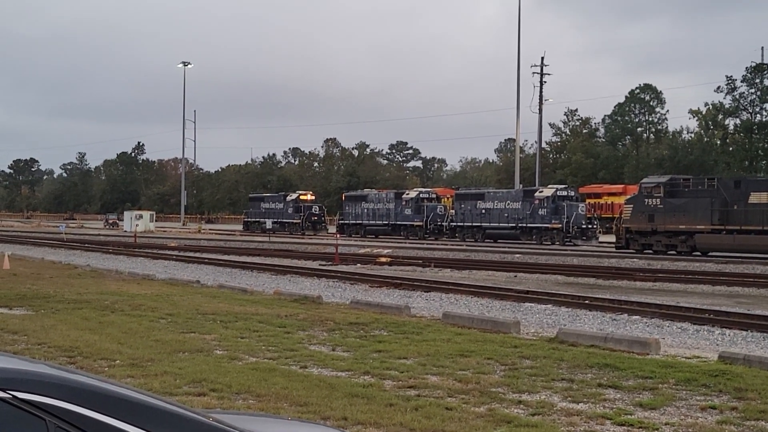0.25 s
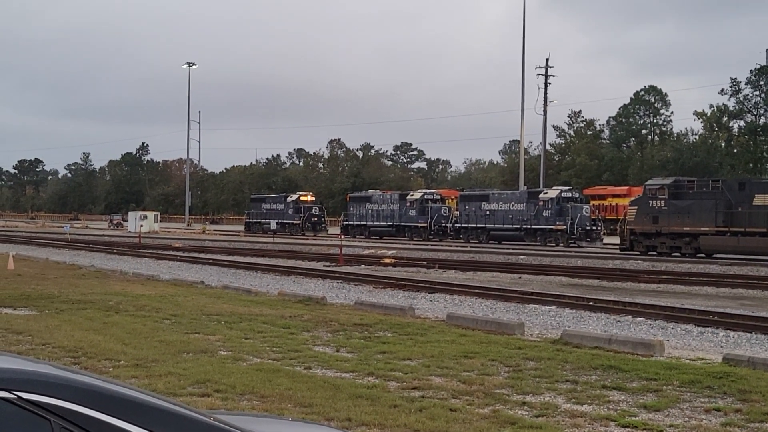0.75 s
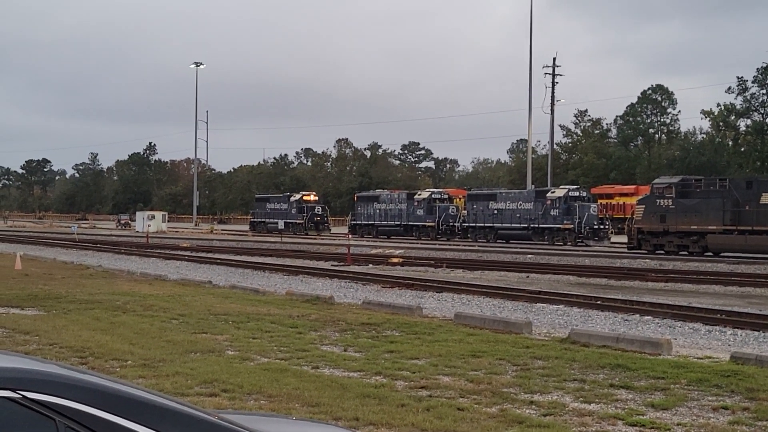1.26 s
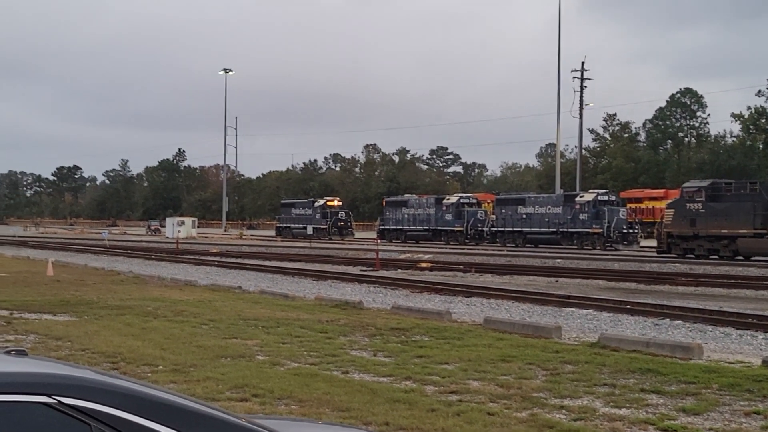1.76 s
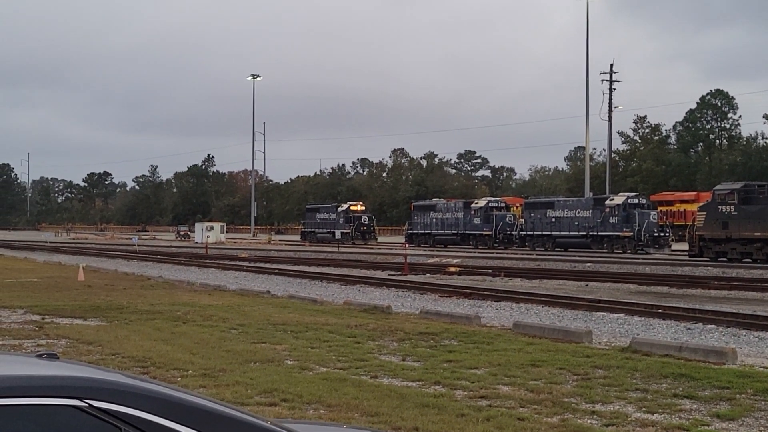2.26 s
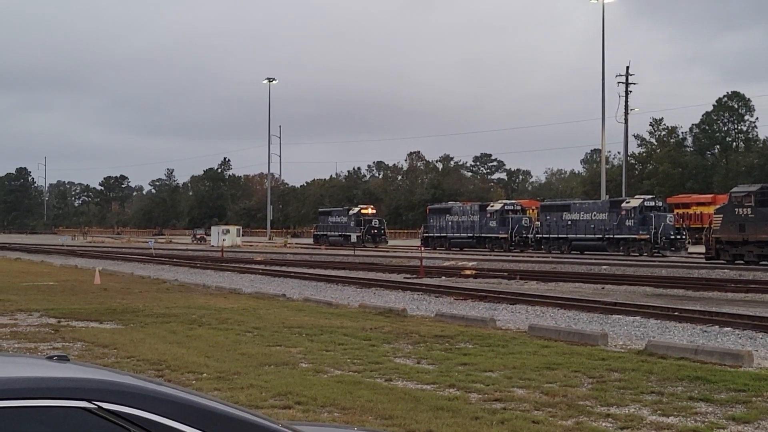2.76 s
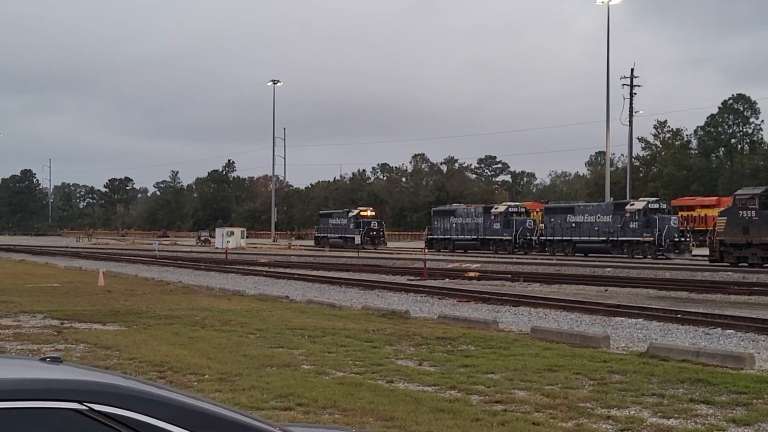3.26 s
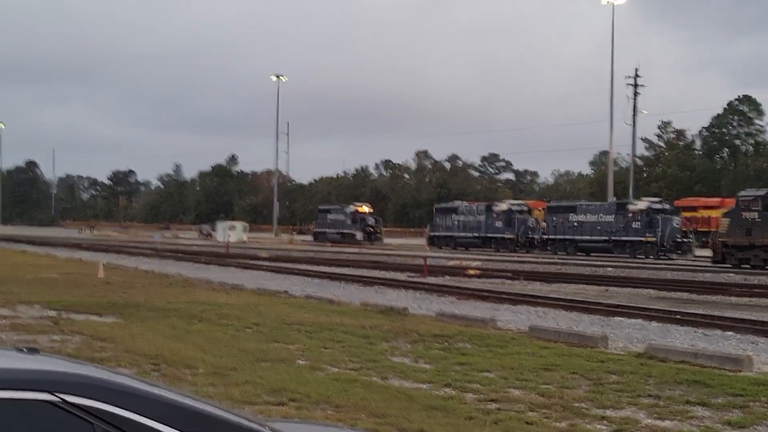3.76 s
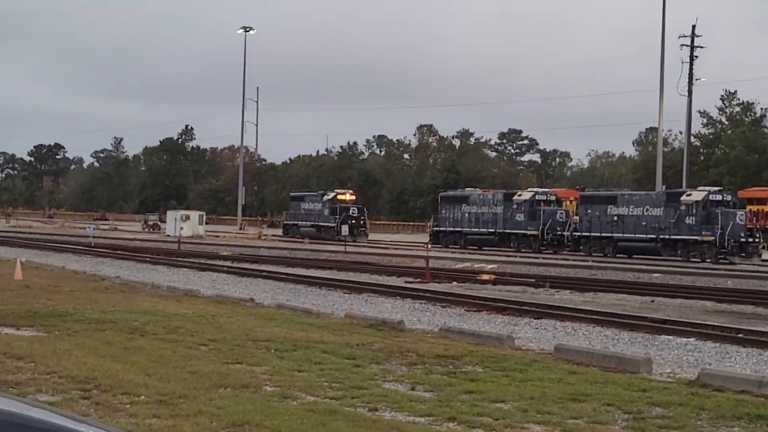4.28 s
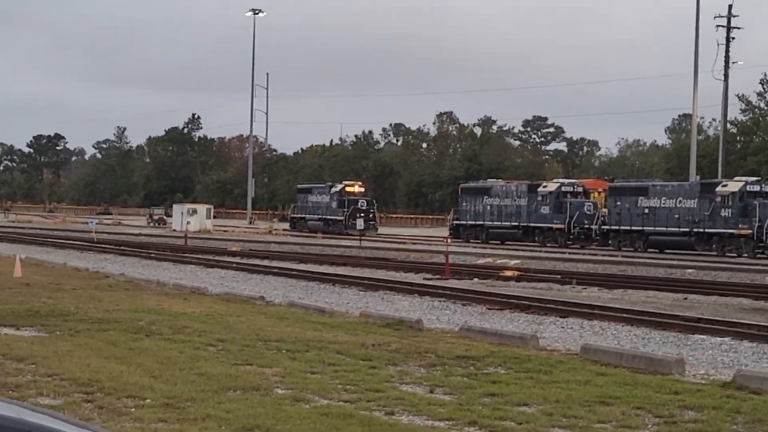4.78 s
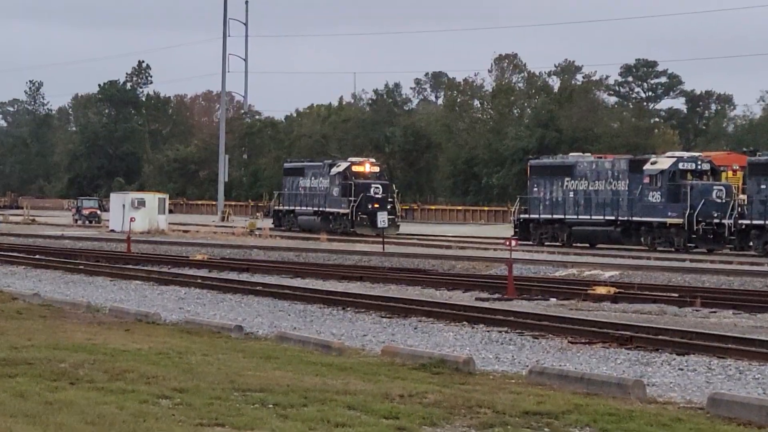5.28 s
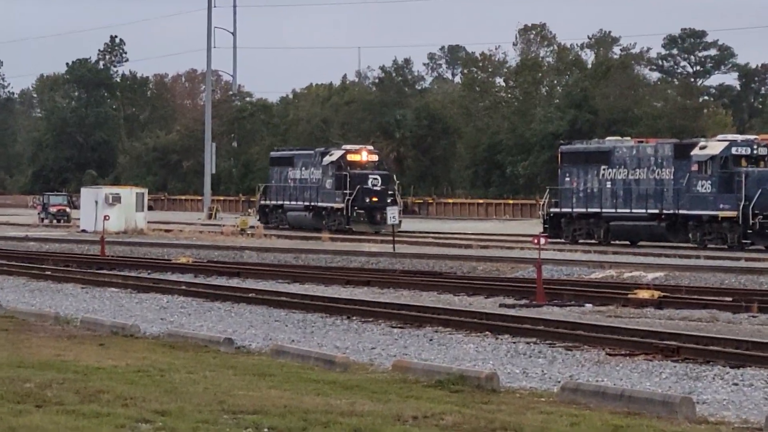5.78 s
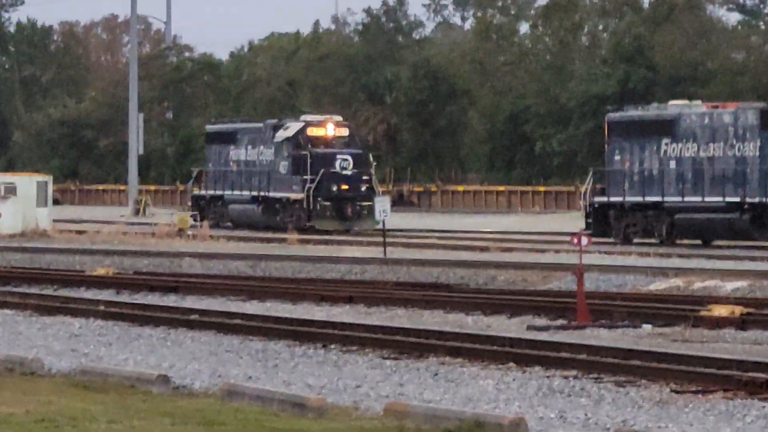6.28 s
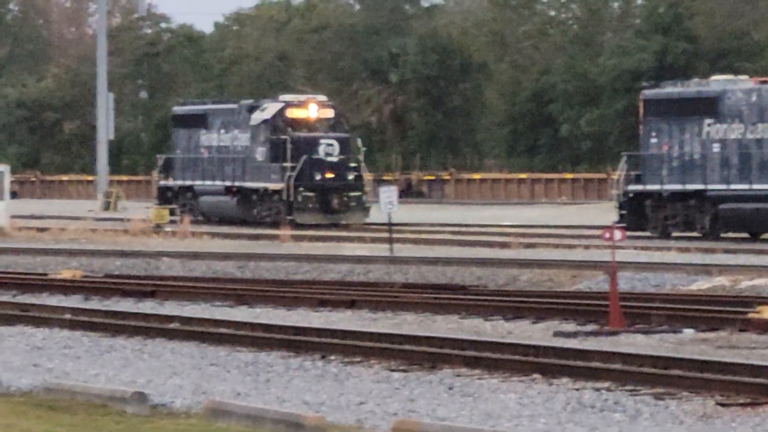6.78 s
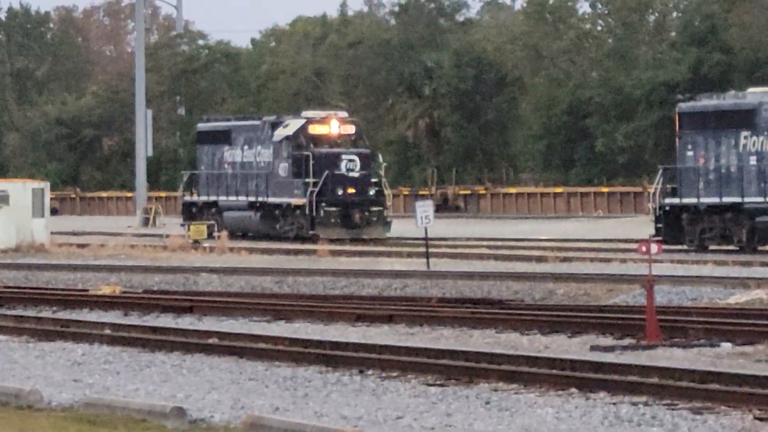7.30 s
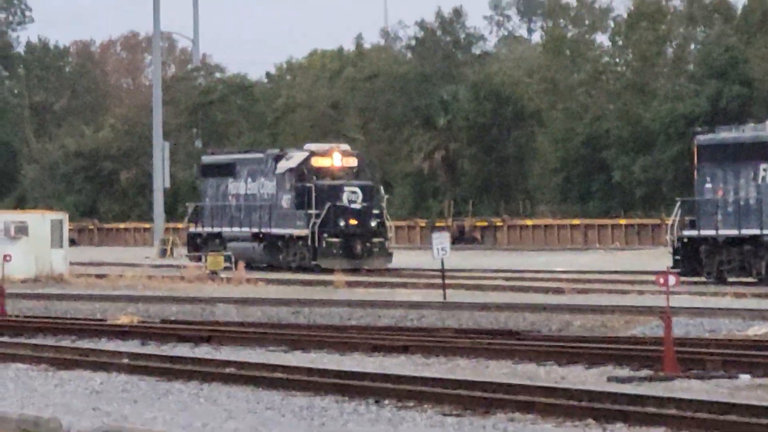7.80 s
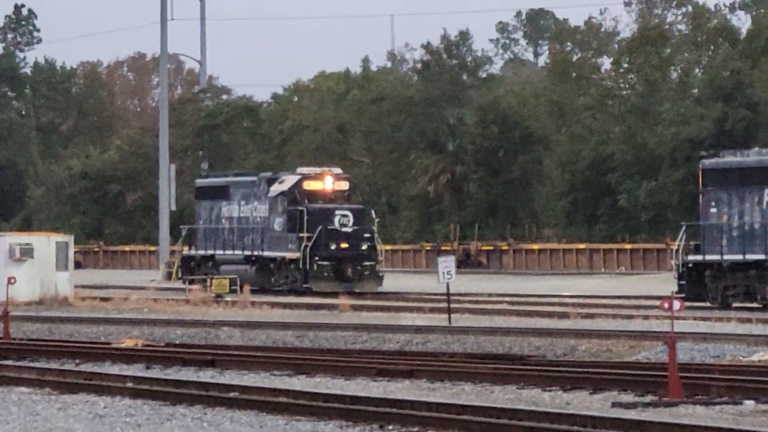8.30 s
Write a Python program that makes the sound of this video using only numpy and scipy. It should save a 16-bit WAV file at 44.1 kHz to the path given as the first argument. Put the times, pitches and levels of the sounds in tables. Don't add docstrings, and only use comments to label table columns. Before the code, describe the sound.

Open rail yard: deep throbbing idle engines, airy fan roar and leaks growing nearer, a sharp air release, falling turbo whistle, wind thumping the microphone.

```python
import sys
import numpy as np
from scipy import signal
from scipy.fft import rfft, irfft, next_fast_len
from scipy.io import wavfile
from scipy.ndimage import uniform_filter1d, map_coordinates

SR = 44100
rng = np.random.default_rng(int(sys.argv[2]) if len(sys.argv) > 2 else 0)


def convert_level_to_amplitude(level_db):
    exponent = np.asarray(level_db, float) / 20
    return 10 ** exponent


def master(y):
    cut = np.clip(np.atleast_2d(y).T, -1, 1)
    pcm = np.round(cut * 32767)
    wavfile.write(sys.argv[1], SR, pcm.astype(np.int16))


N = 376878

# multiple of the firing cycle, level in dB.
NEAR_ORDERS = [(11, -35), (12, -20), (13, -11), (14, -43), (15, 2.5), (16, -5.5), (17, -19), (18, -5),
               (19, -10.5), (20, -12.5), (21, -21), (22, -10), (23, -9.5), (24, -15), (25, -16.5),
               (26, -15), (27, -33), (28, -31)]
SECOND_ORDERS = [(8, -23), (9, -37), (12, -11), (13, -9), (14, -9), (15, -10), (16, 1.5), (17, -13),
                 (18, -10), (19, -15), (20, -13)]
ROLLING_ORDERS = [(7, -13), (8, 0), (9, -16), (10, -15), (11, -12), (12, -15), (13, -4), (14, -21),
                  (15, -5.5), (16, -13), (17, -20), (24, -17.5)]
FAR_ORDERS = [(5, -14), (7, -10), (8, -3), (9, -9), (11, -17), (13, -19), (17, -24)]
NEAR_RATE, SECOND_RATE, ROLLING_RATE, FAR_RATE = 220, 266, 380, 585
# time in seconds, then near, second, rolling
# and far engine in dB.
EXHAUST = [(0, -32, -23, -28.5, -60), (1.5, -26.5, -27.5, -25.5, -24), (3, -25, -30, -28, -30),
           (4.5, -24.5, -28, -23.5, -26.5), (6, -25.5, -24.5, -29, -27.5), (7.2, -22, -27.5, -41, -24),
           (8.55, -20.5, -25, -43, -36)]
# time in seconds, nearness in dB, air blown off in dB.
APPROACH = [(0, 0.5, -1.5), (.6, -0.5, -1.5), (1.3, 0, 0.5), (2.6, 0, 1), (3.1, 1.5, 0), (3.6, -1, -0.5),
            (4, 2, 1.5), (4.5, 4, 2), (5.2, 5.5, 3), (5.7, 5, 2), (6.4, 7, 1), (7, 6, 0.5), (7.6, 5.5, 0.5),
            (8.1, 6, 1), (8.55, 5, 0.5)]
# deepest moment in seconds, depth in dB, sinking time in seconds.
BASS_DIPS = [
    (6.8, -13, 0.26),
    (7.46, -7, 0.064),
]
RECOVER_S = 0.043

# frequency in Hz, level in dB per Hz.
STACK = [(12, -33), (20, -13), (40, -4.5), (69, -3.5), (90, -6.5), (125, -4.5), (160, -51), (280, -120)]
BLOCK = [(65, -42), (110, -20), (132, -3), (156, -2), (248, -9), (312, -14), (420, -29.5), (550, -26.5),
         (920, -120)]
DRONE = [(210, -34), (360, -4.5), (409, -7.5), (680, -8), (735, -6.5), (794, -6.5), (1190, -7.5),
         (1350, -10.5), (1760, -57), (2970, -120)]
FANS = [(740, -51), (1250, -9), (1400, 0), (1650, -2), (1850, -2.5), (2200, -3.5), (2600, -6), (2920, -2.5),
        (3080, -6), (3200, -11), (3700, -14), (4700, -52), (8000, -120)]
LOUVRES = [(2700, -40), (3150, 1), (3500, -1), (4200, -2), (4500, -7), (5200, -50), (8000, -120)]
HISS = [(1940, -60), (3300, -5.5), (4300, -2), (4530, -7.5), (4700, 1.5), (5300, -1.5), (5800, -3.5),
        (6500, -1), (7050, -1), (7520, -5.5), (8700, -12.5), (9200, -22), (12000, -21), (20000, -120)]
AIR = [(6000, -15), (8800, 0.5), (9600, -1), (11300, -5), (11900, -2.5), (14100, -2.5), (15300, -2),
       (15900, -7.5), (20000, -6)]
STACK_DB, BLOCK_DB, DRONE_DB, FANS_DB = -31, -38.5, -45, -45
LOUVRES_DB, HISS_DB, AIR_DB = -52.5, -51, -60
BLOCK_GROWS, DRONE_GROWS, LOUVRES_GROWS = 1.09, 0.64, 0.082
HISS_GROWS, AIR_GROWS, AIR_BLOWS = 0.93, 1, 0.63

# frequency in Hz, level in dB.
WHINES = [(670, -62), (777, -56.5), (1338, -61), (1405, -80), (1841, -72), (3526, -78)]
# frequency in Hz, level in dB.
PANELS = [(1480, -64), (1830, -57), (2380, -64.5), (2600, -60.5), (2950, -60), (3480, -57.5), (4760, -70),
          (6550, -73), (6980, -75)]
PANEL_SMEAR_RAD, PANEL_FLICKER_DB = 2, 3
# frequency in Hz, likeness from 0 to 1.
ALIKE = [(50, 0.6), (90, 0.73), (130, 1), (300, 0.94), (600, 0.53), (1200, 0.71), (2900, 0.4), (3300, 0.13),
         (8400, 0.13), (12000, 0.19), (16000, 0.85)]
LEAKS_ALIKE = [(3000, .35), (6000, .4), (8000, .55), (10500, .45), (16000, .5)]
BEARING_US, BEARING_RATE = 45, .7

# frequency in Hz, level in dB per Hz.
SPIT = [(880, -38), (1500, -23), (2260, -10), (3300, 0), (4000, -8), (4900, -5), (6500, -5), (7600, -5),
        (8200, -3), (8800, -6), (9300, -11), (12000, -14.5), (16200, -20)]
# start in seconds, length in seconds, level in dB, left over right in dB.
VALVES = [
    (4.763, 0.033, -42, -2),
    (5.254, 0.18, -36.5, -1.5),
]
POP, POP_T60_S = .6, .05
NOZZLE_HZ, NOZZLE_WIDTH_HZ, NOZZLE_DB, SPUTTER_DB = 8300, 600, -4, 1.1
# start in seconds, rise in seconds,
# time to fall by 60 dB in seconds, middle frequency in Hz, level in dB.
CHUFFS = [(1.272, 0.0033, 0.51, 3880, -40), (1.775, .004, .15, 9000, -51), (2.555, 0.0063, 0.56, 3240, -42),
          (2.96, 0.0074, 0.091, 3595, -40), (3.095, 0.0092, 0.18, 2940, -39.5),
          (3.4, 0.019, 0.24, 2500, -28.5), (3.43, 0.044, 2.1, 2700, -39.5), (0, 0.078, 3.3, 3900, -50),
          (3.25, 0.12, 0.46, 5500, -46), (3.415, 0.013, 0.14, 4670, -43), (3.2, .15, 0.81, 3800, -37),
          (5.252, .005, .1, 4000, -36), (3.41, 0.016, 0.2, 9150, -50), (3.75, .05, 0.72, 6800, -70),
          (3.64, .12, 2, 2800, -42), (3.74, 0.1, 1.2, 3780, -46), (3.83, 0.14, .1, 2450, -39),
          (5.13, .06, 0.43, 2250, -34), (5.89, 0.039, 0.34, 2800, -36), (6.46, 0.012, 1.05, 2600, -33.5),
          (8.07, 0.062, 0.71, 2600, -38)]
WIDEST, NARROWS_S = 0.97, 0.12
# start in seconds, time to fall by 60 dB in seconds,
# frequency in Hz, level in dB.
RINGS = [(3.07, .3, 2200, -44), (3.482, .05, 3100, -39), (3.395, .12, 3050, -40), (3.59, .3, 2950, -45),
         (3.79, .2, 4000, -43), (3.9, .4, 2400, -44), (5.225, .08, 4100, -38), (5.225, .15, 2850, -41),
         (5.29, .5, 3300, -45), (5.16, .3, 2350, -44), (5.52, .2, 7100, -50), (6.21, .3, 7500, -52),
         (6.455, .3, 4020, -42), (6.5, .2, 3930, -46)]
RING_RISE_S, RING_WIDTH_HZ = 0.032, 200

# time in seconds, frequency in Hz.
TURBO_HZ = [(0, 5410), (2.5, 5368), (4.3, 5350), (5.2, 5200), (5.9, 4830), (6.0, 4795), (6.12, 4690),
            (6.33, 4530), (6.55, 4440), (6.9, 4395), (7.0, 4376), (8.55, 4345)]
# middle in seconds, half length in seconds, level in dB.
SWELLS = [(.24, .18, -59), (.45, .2, -65), (1.2, .6, -70), (1.95, .35, -67), (2.42, .13, -55),
          (2.47, .07, -54), (4.8, .65, -59), (5.55, .3, -63), (5.93, .07, -58), (6.05, .08, -51),
          (6.42, .12, -57), (6.55, .07, -55), (6.7, .3, -61), (7.01, .06, -55), (7.12, .26, -55.5),
          (7.19, .07, -55), (7.37, .07, -63), (8, .5, -66)]
SMEAR_RAD, SMEAR_PER_KHZ = .9, .9
# start
# in seconds, end in seconds, frequency in Hz, level in dB, roughness in radians.
SQUEALS = [(.05, .45, 6830, -60, .7), (.9, 1.9, 6830, -65, .9), (2.1, 2.95, 6830, -65, .6),
           (.1, .62, 13657, -71, .8), (.9, 1.45, 13657, -77, 1.2), (1.45, 1.82, 13657, -70, .8),
           (.1, .5, 10244, -75, .8), (1.0, 1.55, 1005, -62, .4), (4.62, 5.07, 2022, -50, .3),
           (4.95, 5.27, 2020, -48, .3), (5.85, 6.15, 2935, -54, 1.6), (6.2, 6.4, 3000, -51, 1.3),
           (7.0, 7.4, 2895, -54, 1.3), (6.7, 7.25, 10218, -71, 1), (7.0, 8.2, 9787, -75, 1)]
# time in seconds, peak in dB, frequency in Hz, width in Hz, thin top in dB.
TICKS = [
    (4.2536, -21.5, 5900, 2000, -12),
    (4.2566, -36, 6000, 1500, -15),
    (4.2645, -38, 6000, 6000, -2),
    (5.188, -24, 9000, 5000, -9),
    (5.207, -46, 12500, 3000, -8),
    (6.121, -14, 6680, 800, -9),
    (6.1411, -35, 4600, 1500, 0),
]
TICK_PAN_DB = -12

# middle in seconds, half length in seconds, frequency in Hz, level in dB.
BOOMS = [
    (0.187, 0.011, 68, -13.5),
    (2.501, 0.18, 66.7, -30),
    (6.14, 0.041, 162.7, -26.5),
    (6.66, 0.026, 214, -33.5),
    (8.053, 0.075, 69.8, -21),
    (8.07, 0.11, 171.2, -28.5),
]
# middle in seconds, length in seconds, left port in dB, right port in dB, sharpness in dB.
PUFFS = [(0.09, 0.01, -31, -33, -21), (0.21, 0.062, -43, -28.5, -28), (0.382, 0.036, -42, -24, -19),
         (2.209, 0.017, -28.5, -40, -4.5), (2.276, 0.016, -25, -29, -24), (2.44, 0.071, -26, -32, -13),
         (3.12, 0.048, -45, -38, -5), (6.158, 0.05, -23, -28, -25), (6.454, 0.057, -20.5, -31, -7),
         (6.506, 0.038, -26, -30.5, -0.5), (6.66, 0.031, -31, -36, -24), (6.903, 0.034, -28, -19, -7),
         (6.951, 0.028, -28, -32, -6), (7.108, 0.087, -31, -25, -27), (7.271, 0.024, -32, -22, -22),
         (7.394, 0.026, -28, -16, -15), (7.625, 0.031, -38, -28.5, 5.5), (7.664, 0.025, -36, -25.5, -7),
         (7.852, 0.033, -37, -27, -23), (8.086, 0.045, -28, -24, -12), (8.33, 0.061, -37, -46, -12)]
# time in seconds, level in dB.
BREEZE = [(0, -32.5), (.5, -54), (1.5, -41), (2.4, -39.5), (3, -49), (5.8, -43.5), (6.5, -42.5),
          (7.8, -36.5), (8.55, -37)]
# frequency in Hz, level in dB per Hz.
GUST = [(25, -3), (60, 3), (150, -2.5), (260, -11.5), (350, -19.5), (700, -44), (1500, -120)]
FLAP = [(150, -33), (280, 9), (500, -5.5), (650, -20), (900, -47), (2000, -120)]

# frequency in Hz, lag in radians.
LAG = [(0, 0), (250, .1), (1200, 3.1), (1900, 5.5), (2600, 6.3), (3000, 7.3), (8000, 19.5), (16000, 41)]
# frequency in Hz, loss in dB.
SHADOW = [(200, -1), (600, 0.5), (5000, 0.5), (7400, 0.5), (8200, 8.5), (9200, -3.5), (11300, 1),
          (12000, 2)]
TOP_HZ = 15830


def unit(x):
    return x / np.sqrt(np.mean(x ** 2) + 1e-20)


def along(points, hz):
    f, v = np.transpose(points)
    return np.interp(np.log(hz + 1), np.log(f + 1), v)


def curves(rows):
    s, *columns = np.transpose(rows)
    return [np.interp(np.arange(N) / SR, s, c) for c in columns]


def wobble(rate):
    at = np.arange(0, N + 64, 64)
    knots = rng.standard_normal(int(N * rate / SR) + 4)
    return np.interp(np.arange(N), at, map_coordinates(knots, [at * rate / SR]))


def filtered(x, response):
    m = next_fast_len(N + 8192)
    return irfft(rfft(x, m) * response(np.fft.rfftfreq(m, 1 / SR)), m)[..., :N]


def rush(spectrum, patchy_db, alike=ALIKE):
    z = signal.stft(rng.standard_normal((2, N)), nperseg=512)[2]
    field = uniform_filter1d(rng.standard_normal(z.shape[1:]), size=5, axis=0)
    field = uniform_filter1d(field, size=12, axis=1)
    pair = signal.istft(z * convert_level_to_amplitude(patchy_db * unit(field)), nperseg=512)[1][:, :N]

    def response(hz):
        angle = np.arccos(np.clip(along(alike, hz), -1, 1)) / 2
        return convert_level_to_amplitude(along(spectrum, hz)) * [np.cos(angle), np.sin(angle)]

    mid, side = filtered(pair, response)
    return unit(np.array([mid + side, mid - side]))


def panned(db):
    return convert_level_to_amplitude([[db / 2], [-db / 2]])


def engine(per_minute, level_db, orders, hunt):
    speed = per_minute * (1 + hunt * wobble(.8)) / 60
    turn = 2 * np.pi * np.cumsum(speed) / SR
    tones = np.zeros(N)
    for k, db in orders:
        tones += convert_level_to_amplitude(db + 1.13 * wobble(1.144)) * np.sin(k * turn + rng.uniform(0, 2 * np.pi))
    return np.sqrt(2) * convert_level_to_amplitude(level_db) * tones


def locomotives():
    near_db, second_db, rolling_db, far_db = curves(EXHAUST)
    t = np.arange(N) / SR
    tones = panned(0.64) * engine(NEAR_RATE, near_db, NEAR_ORDERS, 0.00036)
    tones += panned(-1.9) * engine(SECOND_RATE, second_db, SECOND_ORDERS, 0.0006)
    tones += panned(-.9) * engine(ROLLING_RATE, rolling_db, ROLLING_ORDERS, 0.001)
    tones += panned(.4) * engine(FAR_RATE, far_db, FAR_ORDERS, 0.0026)
    noise = convert_level_to_amplitude(STACK_DB + 1.5 * wobble(2.45)) * rush(STACK, patchy_db=1.3)
    block_db = BLOCK_DB + BLOCK_GROWS * curves(APPROACH)[0] + 0.3 * wobble(3.06)
    noise += convert_level_to_amplitude(block_db) * rush(BLOCK, patchy_db=0.3)
    duck_db = sum(np.interp(t, [s - sink, s, s + RECOVER_S], [0, db, 0]) for s, db, sink in BASS_DIPS)
    return panned(-1.5) * convert_level_to_amplitude(duck_db) * (convert_level_to_amplitude(-1.3) * tones + noise)


def machinery():
    t = np.arange(N) / SR
    near_db, blow_db = curves(APPROACH)
    drone_db = DRONE_DB + DRONE_GROWS * near_db
    fans_db = FANS_DB + near_db
    louvres_db = LOUVRES_DB + LOUVRES_GROWS * near_db
    hiss_db = HISS_DB + HISS_GROWS * near_db + blow_db
    air_db = AIR_DB + AIR_GROWS * near_db + AIR_BLOWS * blow_db
    surge = wobble(5.3) + 0.5 * wobble(20)
    out = convert_level_to_amplitude(drone_db) * rush(DRONE, patchy_db=1.7)
    out += convert_level_to_amplitude(fans_db + .4 * surge) * panned(-.8) * rush(FANS, patchy_db=1.2)
    out += convert_level_to_amplitude(louvres_db + .6 * surge) * rush(LOUVRES, patchy_db=0.0)
    surge = surge + 1.2 * wobble(10)
    leaks = convert_level_to_amplitude(hiss_db + .75 * surge) * panned(-2.6) * rush(HISS, patchy_db=1.5, alike=LEAKS_ALIKE)
    leaks += convert_level_to_amplitude(air_db + 0.51 * surge) * panned(-7.5) * rush(AIR, patchy_db=1.1, alike=LEAKS_ALIKE)
    shift = BEARING_US * 1e-6 * SR * wobble(BEARING_RATE) / 2
    out[0] += map_coordinates(leaks[0], [np.arange(N) + shift], order=5)
    out[1] += map_coordinates(leaks[1], [np.arange(N) - shift], order=5)
    for hz, db in WHINES:
        level_db = db + drone_db - drone_db.mean() + 3.0 + 0.99 * wobble(10.0)
        out += convert_level_to_amplitude(level_db) * np.sin(2 * np.pi * hz * t + 0.47 * wobble(14))
    for hz, db in PANELS:
        level_db = db + near_db + PANEL_FLICKER_DB * wobble(7)
        out += convert_level_to_amplitude(level_db) * np.sin(2 * np.pi * hz * t + PANEL_SMEAR_RAD * wobble(70))
    return out


def air_releases():
    t, out = np.arange(N) / SR, np.zeros((2, N))
    jet = rush(SPIT, patchy_db=1.2)
    white = rush([(20, 0), (20000, 0)], patchy_db=1.3)
    nozzle = filtered(white, lambda hz: np.exp(-((hz - NOZZLE_HZ) / NOZZLE_WIDTH_HZ) ** 2))
    jet = convert_level_to_amplitude(SPUTTER_DB * wobble(40)) * (jet + convert_level_to_amplitude(NOZZLE_DB) * unit(nozzle))
    for s, length, db, pan_db in VALVES:
        gate = np.clip((t - s) / 0.0032, 0, 1) * convert_level_to_amplitude(-60 * np.maximum(t - s - length, 0) / 0.18)
        pop = 1 + POP * convert_level_to_amplitude(-60 * np.abs(t - s) / POP_T60_S)
        out += convert_level_to_amplitude(db) * panned(pan_db) * gate * pop * jet
    wide = [(s, rise, t60, hz, hz * WIDEST / (1 + rise / NARROWS_S), db) for s, rise, t60, hz, db in CHUFFS]
    narrow = [(s, RING_RISE_S, t60, hz, RING_WIDTH_HZ, db) for s, t60, hz, db in RINGS]
    u = t[:SR]
    for s, rise, t60, hz, width_hz, db in wide + narrow:
        a = round(s * SR)
        edges_hz = [max(hz - width_hz / 2, 200), hz + width_hz / 2]
        band = signal.butter(2, edges_hz, "bandpass", fs=SR, output="sos")
        shape = np.clip(u / rise, 0, 1) ** 2 * convert_level_to_amplitude(-60 * np.maximum(u - rise, 0) / t60)
        piece = unit(signal.sosfilt(band, white[:, a:a + SR]))
        out[:, a:a + SR] += convert_level_to_amplitude(db) * piece * shape[:piece.shape[1]]
    return out


def turbo():
    t, (hz,) = np.arange(N) / SR, curves(TURBO_HZ)
    swell = sum(convert_level_to_amplitude(db) * np.exp(-((t - s) / half) ** 4) for s, half, db in SWELLS)
    smear = (SMEAR_RAD + SMEAR_PER_KHZ * (hz - 4400) / 1000) * wobble(110)
    turn = 2 * np.pi * np.cumsum(hz) / SR + smear
    return panned(-3) * swell * convert_level_to_amplitude(4 + 3.2 * wobble(30)) * np.sin(turn)


def squeals():
    t, out = np.arange(N) / SR, np.zeros(N)
    jitter, flutter = wobble(110), wobble(16)
    for start, end, hz, db, rough in SQUEALS:
        span = slice(round(start * SR), round(end * SR))
        u = t[span] - start
        shift = rng.integers(N)
        swell = np.clip(np.minimum(u / .12, (end - start - u) / .03), 0, 1)
        turn = 2 * np.pi * hz * u + .75 * rough * np.roll(jitter, shift)[span]
        out[span] += convert_level_to_amplitude(db + 4 + 2.5 * np.roll(flutter, shift)[span]) * swell * np.sin(turn)
    return panned(-3) * out


def ticks():
    before = 200
    t, out = np.arange(-before, 312) / SR, np.zeros((2, N))
    f = np.fft.rfftfreq(len(t), 1 / SR)
    for s, db, hz, width_hz, top_db in TICKS:
        rattle = .12 * (t > 0) * convert_level_to_amplitude(-60 * t / .012)
        grit = (np.exp(-(t / .0007) ** 2) + rattle) * rng.standard_normal(len(t))
        body = np.exp(-((f - hz) / width_hz) ** 2)
        body += convert_level_to_amplitude(top_db) * np.exp(-((f - 14900) / 2600) ** 2) + convert_level_to_amplitude(-23) * (f > 4000)
        click = irfft(rfft(grit) * body * (f < TOP_HZ), len(t))
        a = round(s * SR) - before
        out[:, a:a + len(t)] += convert_level_to_amplitude(db) * panned(TICK_PAN_DB) * click / np.abs(click).max()
    return out


def booms():
    t, out = np.arange(N) / SR, np.zeros(N)
    for s, half, hz, db in BOOMS:
        out += convert_level_to_amplitude(db + 3) * np.exp(-((t - s) / half) ** 2) * np.sin(2 * np.pi * hz * (t - s))
    return out


def wind():
    t = np.arange(N) / SR
    low = convert_level_to_amplitude(curves(BREEZE)[0] + 4.0 * np.array([wobble(7.4), wobble(7.8)]))
    sharp = np.zeros((2, N))
    for s, length, left_db, right_db, sharp_db in PUFFS:
        span = slice(max(round((s - .3) * SR), 0), round((s + .3) * SR))
        puff = convert_level_to_amplitude([[left_db], [right_db]]) * np.exp(-((t[span] - s) / (0.65 * length)) ** 2)
        low[:, span] += puff
        sharp[:, span] += convert_level_to_amplitude(sharp_db) * puff
    apart = [(30, 0.27)]
    gusts = convert_level_to_amplitude(5) * low * rush(GUST, patchy_db=2.5, alike=apart)
    return gusts + sharp * rush(FLAP, patchy_db=0.0, alike=apart)


def scene():
    yard = locomotives() + machinery() + air_releases()
    sides = np.array([[1], [-1]])

    def late(hz):
        lag = np.interp(hz, *np.transpose(LAG))
        return np.exp(-.5j * lag * sides) * convert_level_to_amplitude(-along(SHADOW, hz) * sides / 2)

    return filtered(yard, late) + squeals() + turbo() + ticks() + wind() + booms()


def band_limit(x):
    return signal.sosfilt(signal.butter(12, 15850, fs=SR, output="sos"), x)


def record(dry):
    soft = dry / (1 + np.abs(dry / .66) ** 4) ** (1 / 4)
    mix = filtered(soft, lambda hz: hz < TOP_HZ)
    return band_limit(mix)


dry = scene()
out = record(dry)
master(out)
```